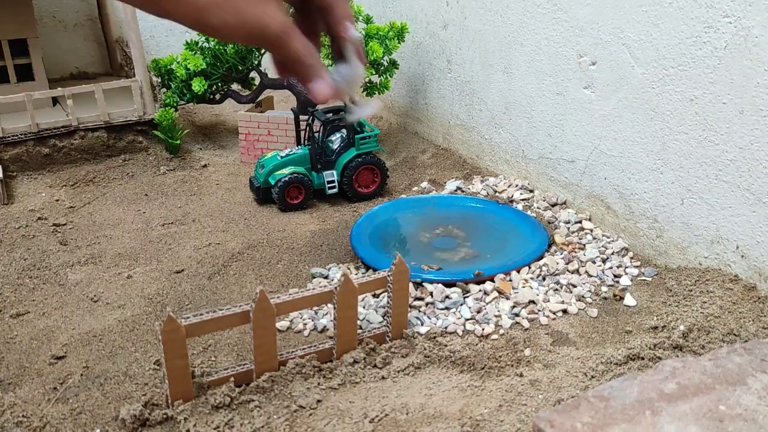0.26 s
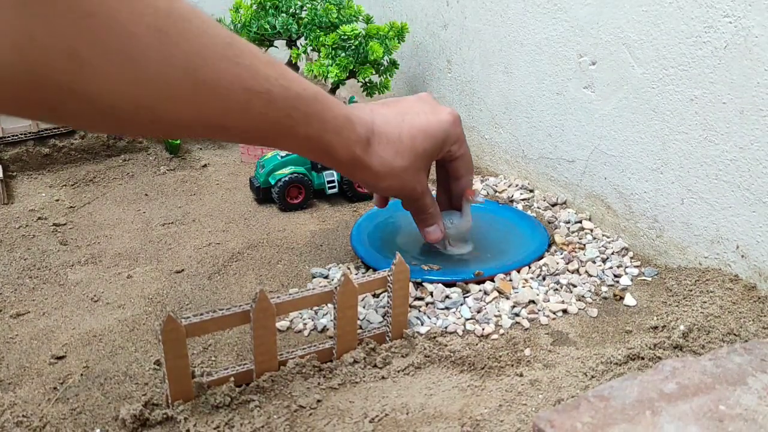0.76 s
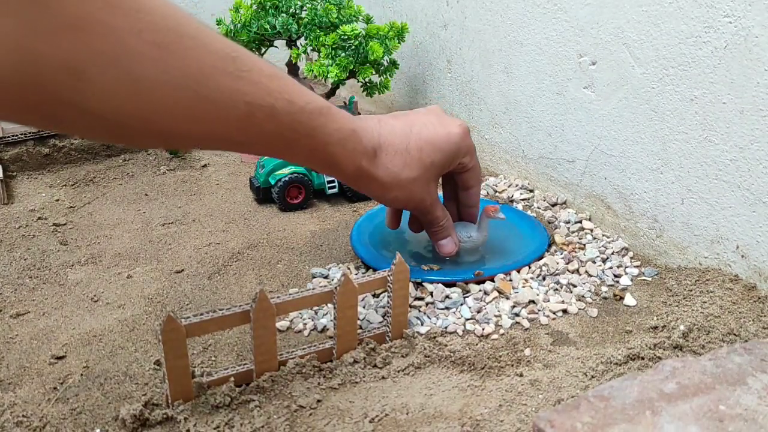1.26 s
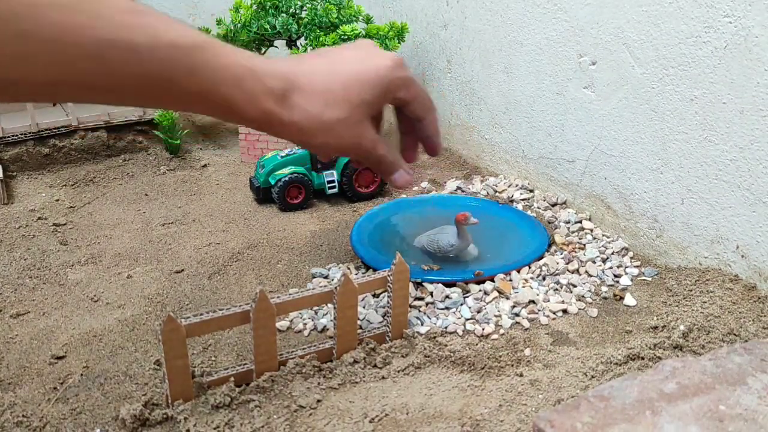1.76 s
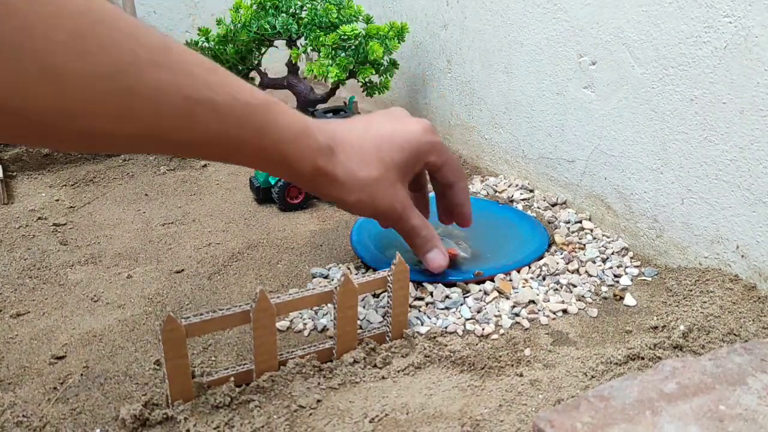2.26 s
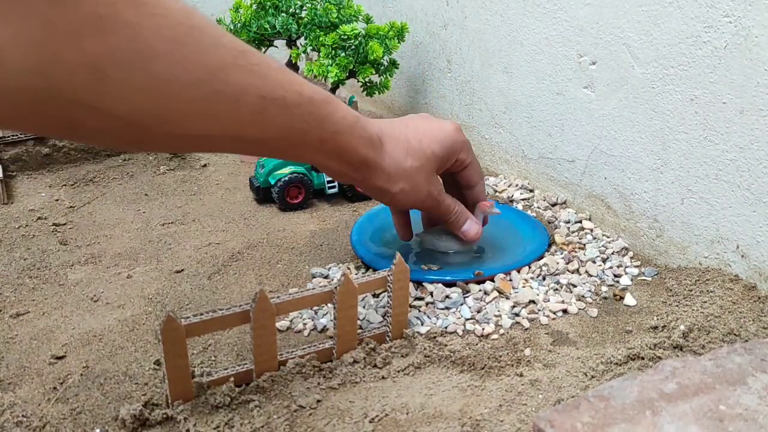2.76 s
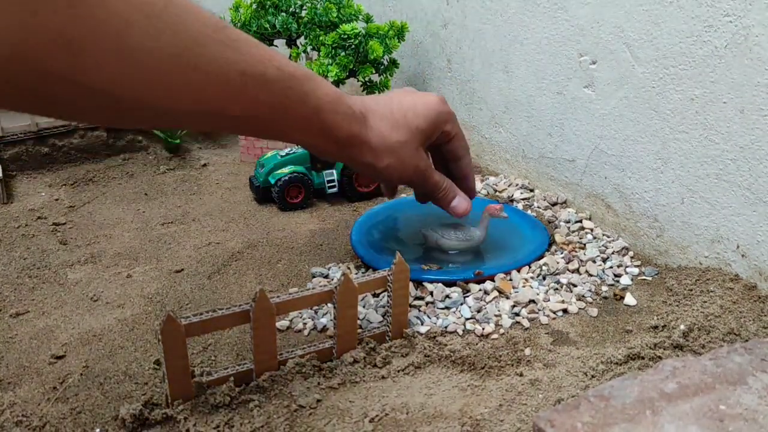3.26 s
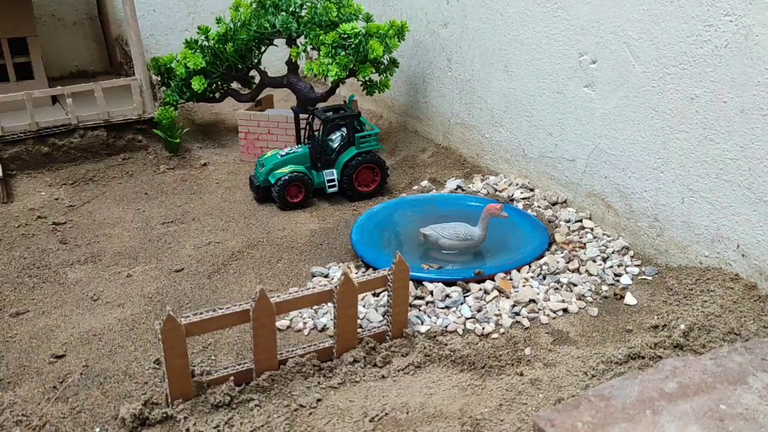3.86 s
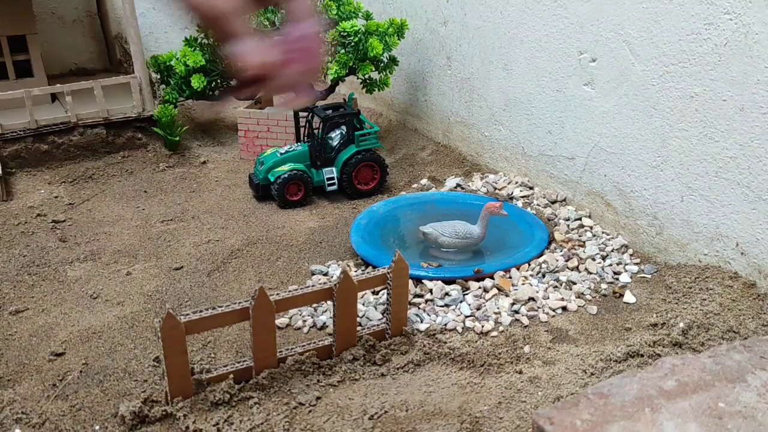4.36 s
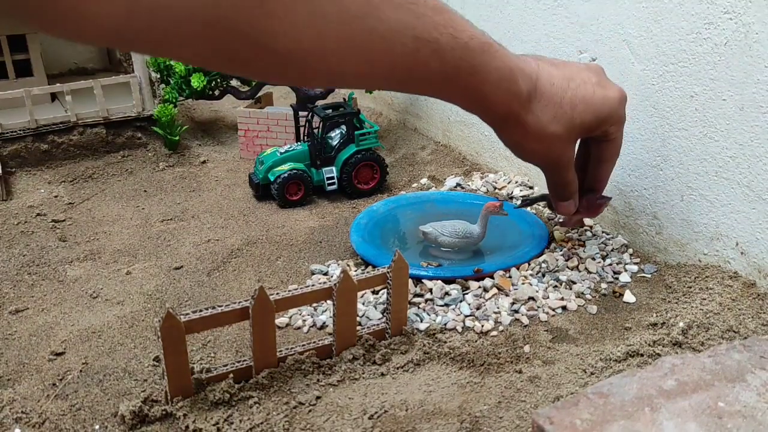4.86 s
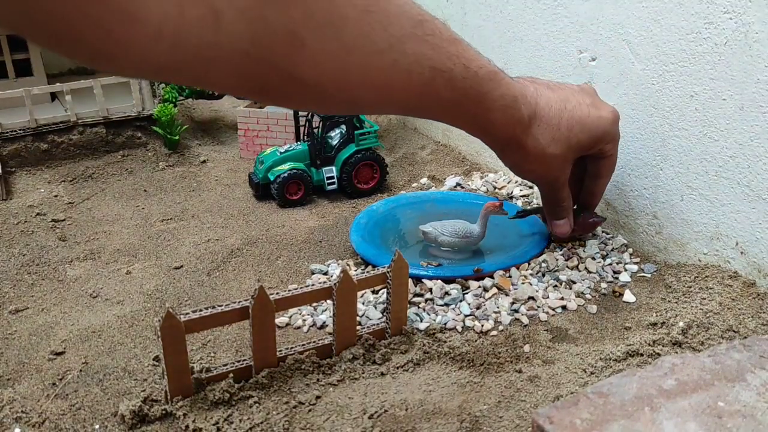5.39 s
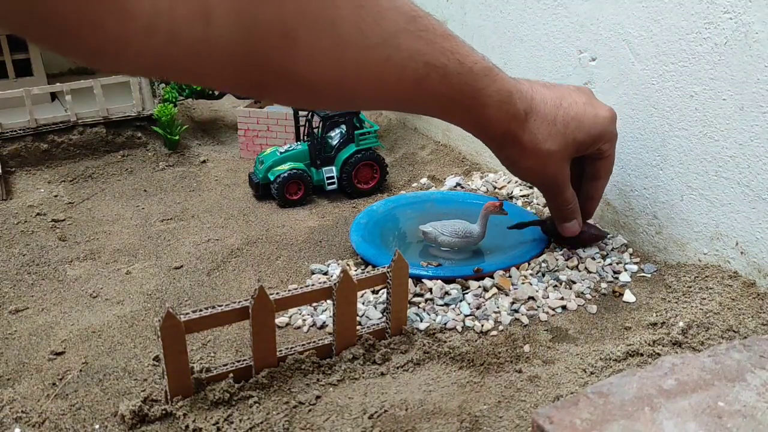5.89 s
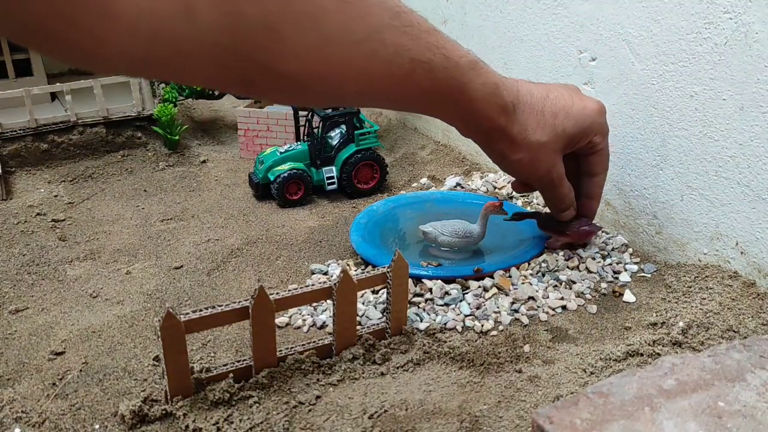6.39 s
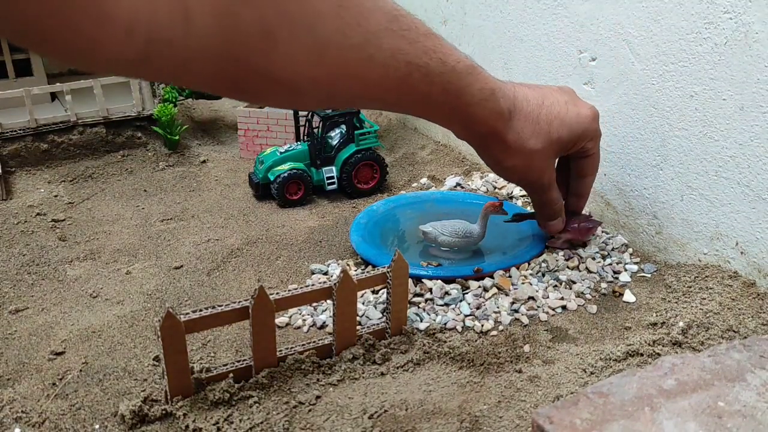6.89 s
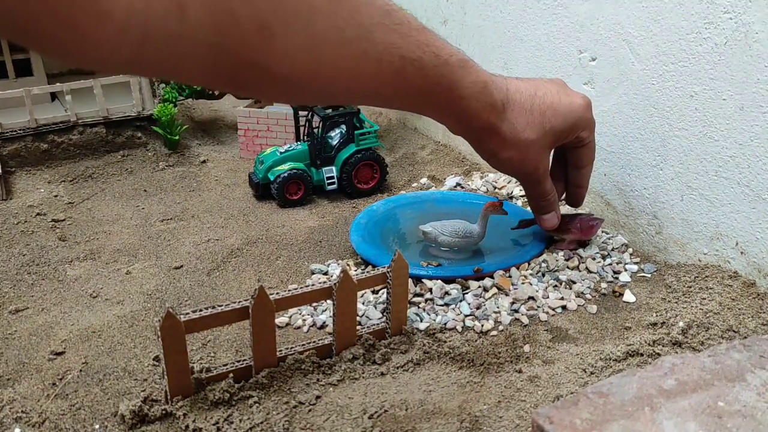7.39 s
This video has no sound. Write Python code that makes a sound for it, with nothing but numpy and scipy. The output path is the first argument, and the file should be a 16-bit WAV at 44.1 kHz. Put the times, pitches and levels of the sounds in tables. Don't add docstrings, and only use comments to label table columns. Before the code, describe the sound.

A stereo outdoor microphone catches lively bird chatter over faint far-traffic hiss. A clear rasping chirp opens, then twitters and tiny high squeaks; hoarse trills overlap around two seconds, a bright high call stands out past four, and busy mixed chirping closes the scene. Small wind thuds nudge the right side early, two dull knocks fall near start and end, and dry ticks click in the later part. Short wall reflections surround the birds.

```python
import sys
import numpy as np
from scipy import signal
from scipy.fft import rfft, irfft, next_fast_len
from scipy.io import wavfile
from scipy.ndimage import uniform_filter1d

SR = 44100
rng = np.random.default_rng(int(sys.argv[2]) if len(sys.argv) > 2 else 0)


def persist_wave(psi):
    counts = np.round(np.clip(psi, -1, 1) * 32767).astype(np.int16)
    wavfile.write(sys.argv[1], SR, np.atleast_2d(counts).T)


def volts_from_decibels(level):
    exponent = np.asarray(level, float) / 20
    return 10 ** exponent


N = 336924

# frequency in Hz, phase in rad.
PORT_PHASE = [(30, 0), (500, -.3), (5200, -.2), (7000, -.7), (8500, -1.3), (12000, -2.2), (15500, -2.8)]
# lift in Hz, swing on the beat in Hz, swing between
# beats in Hz, sharpness, swing at the start as a share, how far swing tops stay put as the call sinks
# (0-1), throat width in Hz.
LOW_PITCH_BEAT = (-90, 1300, 600, 3.8, 1, .9, 420)


def evened(x):
    return x / np.sqrt(np.mean(abs(x) ** 2) + 1e-20)


def read(points, hz):
    f, value = np.transpose(points)
    return np.interp(np.log(hz + 1), np.log(f + 1), value)


def add(mix, start_s, sound, pan_db):
    part = mix[:, round(start_s * SR):][:, :len(sound)]
    gains = volts_from_decibels(np.array([[pan_db / 2], [-pan_db / 2]]))
    part += gains * sound[:part.shape[1]]


def flutter(size, hz):
    z = rng.standard_normal((size, 2)) @ [1, 1j]
    r = np.exp(-2 * np.pi * hz / SR)
    return evened(signal.lfilter([1], [1, -2 * r, r * r], z))


def hiss():
    # frequency in Hz, level in dB.
    colour = [(22, -50.5), (40, -36.5), (60, -10.5), (100, -22.5), (160, -20.5), (300, -15), (900, 1),
              (1900, -6), (3000, -1), (4200, -4.5), (7400, -15), (10700, -17.5), (13000, -30),
              (16000, -21.5)]
    # frequency in Hz, correlation (-1 to 1).
    likeness = [(60, 0.4), (130, 0.74), (290, 0.863), (640, 0.706), (1410, 0.685), (3100, 0.216),
                (6820, -0.081), (15000, -0.069)]
    # frequency in Hz, level in dB.
    port_tilt = [(60, -12.5), (180, -2.5), (550, -3.5), (1650, -0.5), (4970, -0.5), (15000, 0)]
    frames, hz = N // 256 + 5, np.fft.rfftfreq(1024, 1 / SR)
    a, b, c, d, patches = rng.standard_normal((frames, 513, 5)).T
    patches = uniform_filter1d(patches, 14, 0)
    patches = evened(uniform_filter1d(patches, 16, 1))
    same = np.clip(read(likeness, hz), -1, 1)[:, None]
    right = a + 1j * b
    left = same * right * np.exp(1j * read(PORT_PHASE, hz))[:, None]
    left = left + np.sqrt(1 - same ** 2) * (c + 1j * d)
    z = np.array([left * volts_from_decibels(read(port_tilt, hz))[:, None], right])
    z *= volts_from_decibels(read(colour, hz)[:, None] + 1.193 * patches)
    noise = signal.istft(z, nperseg=1024, noverlap=768)[1][:, :N]
    return volts_from_decibels(-37.5) * evened(noise)


def hum():
    # frequency in Hz, width in Hz, level in dB.
    lines = [(59.15, 8.8, -72), (105.9, 6.7, -70), (233.1, 8.85, -69.5)]
    t = np.arange(N) / SR
    return sum(volts_from_decibels(db) * (flutter(N, width_hz) * np.exp(2j * np.pi * hz * t)).real
               for hz, width_hz, db in lines)


def wind_bumps():
    # start in seconds, peak in dB, left over right in dB.
    puffs = [
        (0.019, -62.5, -12),
        (0.32, -46.5, -15),
        (0.459, -51.5, -14.5),
        (0.549, -55, -19.5),
        (0.699, -68.5, -12),
        (1.979, -57.5, -12.5),
        (2.298, -66, -12.5),
        (2.749, -55, -9),
    ]
    out, t = np.zeros((2, N)), np.arange(6000) / SR
    for start_s, db, pan_db in puffs:
        thud = np.sin(2 * np.pi * 45 * t + flutter(len(t), 9.5).real)
        push = 9.8 * np.sin(np.pi * t / t[-1]) ** 2 * np.exp(-t / 0.0192)
        add(out, start_s, volts_from_decibels(db) * thud * push, pan_db)
    return out


def foliage(x, spread_s, count=7):
    whole = signal.hilbert(x, next_fast_len(len(x)))[:len(x)]
    late = (rng.random(count) * spread_s * SR).astype(int)
    copies = ((flutter(len(x), 18) * np.pad(whole, (n, 0))[:len(x)]).real for n in late)
    return sum(copies) / np.sqrt(count)


def whistle(s, hz, db, blur=0.056):
    t = np.arange(0, s[-1], 1 / SR)
    turn = np.exp(2j * np.pi * np.cumsum(np.interp(t, s, hz)) / SR)
    tone = turn * (1 - blur / 2 + blur / 2 * flutter(len(t), 250))
    return volts_from_decibels(np.interp(t, s, db)) * tone.real * signal.windows.tukey(len(t), .15)


def twitters():
    # start in seconds, level in dB, pitch factor, opening in dB, blur (0-1).
    twitter_rows = [
        (.083, -37, 1, -3, .3),
        (.868, -38.5, .98, 1, .45),
        (3.951, -37, .96, -12, .15),
        (6.509, -39, 1.01, 8, .5),
        (7.347, -35.5, 1, 2, .4),
    ]
    # time in seconds, pitch in Hz, level in dB.
    spike = [(0, 4200, -14), (.008, 5000, -7), (.018, 5700, -9), (.024, 4600, -5), (.032, 4150, -4),
             (.046, 3930, -7), (.054, 3800, -22)]
    # time in seconds, pitch in Hz, level in dB.
    hop = [(.07, 3700, -16), (.08, 4000, -4), (.089, 4500, 0.1), (.096, 3800, -4), (.104, 3550, -5),
           (.11, 3600, -14)]
    out = np.zeros((2, N))
    tune_s, tune_hz, tune_db = np.transpose(spike + hop)
    for start_s, db, factor, open_db, blur in twitter_rows:
        opening_db = open_db * (np.arange(len(tune_s)) < 3)
        tone = whistle(tune_s, factor * tune_hz, db + 11 + tune_db + opening_db, blur)
        tone = np.pad(tone, (0, 3000))
        add(out, start_s, np.sqrt(1 - blur) * tone + np.sqrt(blur) * foliage(tone, .04), -1.1)
    return out


def curved_whistle(length_s, start_hz, middle_hz, end_hz, db):
    u = np.linspace(0, 1, 12)
    curve = np.polyfit([0, .5, 1], [start_hz, middle_hz, end_hz], 2)
    return whistle(u * length_s, np.polyval(curve, u), db + 3 + 9 * (np.sin(np.pi * u) - 1))


def squeaks():
    # start in seconds, length in seconds, start pitch in Hz, level in dB.
    squeak_rows = [
        (.136, .01, 14200, -50),
        (.658, .009, 13000, -52),
        (.701, .006, 14200, -52),
        (.716, .013, 14000, -50),
        (.802, .005, 15000, -55),
        (.821, .006, 14000, -50),
        (.836, .012, 14200, -49),
        (.938, .007, 14200, -50),
        (.953, .012, 14000, -50),
    ]
    out = np.zeros((2, N))
    for start_s, length_s, hz, db in squeak_rows:
        fall_hz = 185000 * length_s
        middle_hz = hz - .58 * fall_hz
        add(out, start_s, curved_whistle(length_s, hz, middle_hz, hz - fall_hz, db), 3)
    return out


def phrase(call, voice, effort, arch):
    start_s, length_s, peak_db, top_hz, end_hz = call
    loudest, first_db, top_db = voice
    attack_s, release_s, swell_db_per_s, fade_db_per_s = effort
    crest, scoop_hz, bend = arch
    t = np.arange(0, length_s, 1 / SR)
    late = t - loudest * length_s
    drop_db = np.where(late < 0, -swell_db_per_s * late, fade_db_per_s * late)
    attack = np.clip(1 - t / attack_s, 0, 1)
    release = np.clip(1 - (length_s - t) / release_s, 0, 1)
    drop_db += 5.5 * (attack + release)
    sag = (t / length_s - crest) / (1 - crest)
    hz = top_hz - scoop_hz * np.clip(1 - t / length_s / crest, 0, 1) ** 2
    hz -= (top_hz - end_hz) * np.clip(sag, 0, 1) ** bend
    first_db = first_db + 0.91 * drop_db + 1.5 * sag
    return start_s + t, peak_db - drop_db, hz, first_db, top_db + 0.072 * drop_db


def buzz(course, beat_s, per_s, hoarse, beat):
    # noisy share (0-1), noise width in Hz.
    rasps = [(.2, 400), (.08, 330), (.4, 600), (.45, 700), (.7, 900), (.8, 1100)]
    # frequency in Hz, gain in dB.
    beak_gain = [(1750, -36), (2050, -22), (2300, -7), (2750, -7), (3200, 3), (4100, 0), (4800, -1),
                 (5500, -2), (6600, -7), (7300, -22), (9000, -25), (12000, -22), (14000, -38)]
    t, level_db, hz, first_db, top_db = course
    lift_hz, on_hz, off_hz, sharp, early, stay, throat_hz = beat
    sunk_hz = stay * (2000 - hz / 2)
    grow = np.linspace(early, 2 - early, len(t))
    swing = np.cos(2 * np.pi * per_s * (t - beat_s) + .8 * hoarse * flutter(len(t), 20).real)
    pitch = hz / 2 + lift_hz + (grow * on_hz + sunk_hz) * np.exp(sharp * (swing - 1))
    pitch += (grow * off_hz + sunk_hz) * np.exp(-sharp * (swing + 1))
    pitch += 130 * hoarse * flutter(len(t), 150).real
    turn = np.exp(2j * np.pi * np.cumsum(pitch) / SR)
    partials = []
    for k, (rasp, rasp_hz) in enumerate(rasps, 1):
        rasp = min(rasp + .45 * hoarse, 1)
        unsteady = np.sqrt(1 - rasp) + np.sqrt(rasp) * flutter(len(t), rasp_hz)
        partials.append(volts_from_decibels(read(beak_gain, k * pitch)) * (unsteady * turn ** k).real)
    partials[1] *= .25 + 1 / (1 + ((2 * pitch - hz) / throat_hz) ** 2)
    groups = (partials[0],
              partials[1] + volts_from_decibels(-41) * partials[2],
              volts_from_decibels(-10) * partials[2] + sum(partials[3:]))
    levelled = []
    for group in groups:
        group = np.sqrt(1 - hoarse) * group + np.sqrt(hoarse) * foliage(group, .025)
        levelled.append(group / np.sqrt(uniform_filter1d(group ** 2, 1810) + 1e-12))
    first, second, top = levelled
    voice = second + volts_from_decibels(first_db) * first + volts_from_decibels(top_db) * top
    fade = np.clip(np.minimum(t - t[0], t[-1] - t) / .02, 0, 1)
    return volts_from_decibels(level_db - 0.1469) * voice * np.sqrt(fade)


def trilled_calls(calls, voices, trills, hoarse, effort, arch, beat):
    out = np.zeros((2, N))
    for call, voice, (beat_s, per_s, pan_db), hoarseness in zip(calls, voices, trills, hoarse):
        course = phrase(call, voice, effort, arch)
        add(out, call[0], buzz(course, beat_s, per_s, hoarseness, beat), pan_db)
    return out


def low_calls():
    # start in seconds, length in seconds, peak of the second partial in dB, its top
    # in Hz, its end in Hz.
    calls = [
        (.215, .315, -24.5, 4139, 3624),
        (1.93, 0.4256, -29, 4191, 3646),
        (2.3, .33, -29.5, 3961, 3859),
        (3.19, 0.2576, -26, 4177, 3740),
        (3.66, .27, -28.5, 4263, 3712),
        (5.145, 0.292, -25.5, 4269, 3713),
    ]
    # loudest moment as a share of the length, first partial over the second
    # in dB, top partials over it in dB.
    voices = [(0.52, -8.5, -12.5), (0.7, -12, -11.5), (0.15, -6.5, -9), (0.69, -10, -14.5), (0.03, -8, -10),
              (0.59, -9, -12)]
    # time of one beat in seconds, beats per second, left over right in dB.
    trills = [(0.3921, 59.2, -1.7), (2.129, 52.9, -1.57), (2.4527, 43.8, -1.96), (3.329, 48.8, -1.05),
              (3.8364, 43.84, -1.43), (5.3026, 49.5, -1)]
    hoarse = [.25, .7, .95, .22, .8, .14]
    # attack in seconds, release in seconds, swell in dB per second, fade in dB per second.
    effort = (0.111, 0.0387, 13.5, 52)
    # top as a share of the length, scoop up to it in Hz, bend of the sag.
    arch = (0.2699, 306.7, 1.2)
    return trilled_calls(calls, voices, trills, hoarse, effort, arch, LOW_PITCH_BEAT)


def far_calls():
    calls = [(.93, 0.1266, -40, 3860, 3740), (1.3, 0.534, -44.5, 4020, 3436),
             (4.2, 0.193, -35.5, 4595, 4450), (4.59, 0.2875, -29, 4183, 3224),
             (4.925, .24, -36, 3402, 2905), (6.13, 0.32, -43, 3589, 3033), (6.535, .35, -27, 4254, 2890),
             (6.9, 0.221, -40.5, 3201, 3267), (7.43, 0.277, -29.5, 3720, 3250),
             (.5, 0.332, -37.5, 5026, 4902), (2.1, 0.469, -37.5, 5133, 4945), (2.6, .27, -36, 3030, 2782),
             (4.34, 0.345, -35.5, 3306, 2805), (7.15, 0.2523, -36.5, 3137, 3001),
             (2.18, 0.1984, -29.5, 3462, 3184), (6.57, .3, -34, 3195, 2685), (4.66, .24, -33.5, 3523, 3017)]
    voices = [(0.45, -8, -6), (0.402, -7, -3.5), (0.46, -15, -23.5), (0.46, -23.5, -11.5),
              (0.497, -6.5, -27.5), (0.46, -6.5, -30.5), (0.305, -12, -13.5), (0.44, 0, -26),
              (0.525, -20.5, -15), (0.44, -0.5, -16.5), (0.595, -5, -17), (0.373, -8, -7),
              (0.237, -9.5, -19.5), (0.38, -12.5, -24.5), (0.625, -15.5, -28), (0.44, -13.5, -27),
              (0.51, -23, -26)]
    trills = [(1.0336, 41.82, -1.5), (1.5823, 50.37, 1), (4.2374, 41.26, -1.3), (4.7371, 47.7, -1.5),
              (5.036, 48.58, -3), (6.2937, 40.0, -1), (6.7193, 46.56, -0.8), (6.987, 47.45, -2.5),
              (7.5379, 48.44, -3.5), (.62, 46.18, -1.5), (2.35, 45, -1), (2.7, 46.86, -3), (4.45, 45.6, -3),
              (7.25, 48, -4), (2.25, 48, -4), (6.7, 46.9, -4.5), (4.75, 47.22, -5)]
    hoarse = [.9, .9, .8, .6, .75, .9, .6, .7, .75, .9, .9, .9, .9, .8, .8, .85, .85]
    effort = (.04, .05, 40, 50)
    arch = (.2, 98.1, 1.2)
    beat = (-170, 1000, 560, 3, .9, .5, 700)
    return trilled_calls(calls, voices, trills, hoarse, effort, arch, beat)


def rattle_calls():
    calls = [
        (.62, .21, -36.5, 3883, 3639),
        (3.51, 0.183, -33, 3702, 3696),
        (5.485, 0.1765, -34.5, 3710, 3529),
    ]
    voices = [(0.163, 3.22, -6.5), (0.883, 1.24, -12), (0.43, 1, -17.5)]
    trills = [(0.715, 49.31, -1.3), (3.596, 49.72, -1.6), (5.6168, 47.66, -1.9)]
    hoarse = [.17, .22, .14]
    effort = (0.042, 0.0465, 44, 82)
    arch = (.3, 49, 1.059)
    return trilled_calls(calls, voices, trills, hoarse, effort, arch, LOW_PITCH_BEAT)


def knocks():
    # start in seconds, level in dB.
    knock_rows = [
        (.318, -39.5),
        (6.73, -42.5),
    ]
    # frequency in Hz, level in dB, t60 in seconds.
    modes = [(578.7, 0.1, 0.155), (908, 2.7, 0.13)]
    out, t = np.zeros((2, N)), np.arange(6000) / SR
    for start_s, knock_db in knock_rows:
        body = sum(volts_from_decibels(knock_db + db - 60 * t / t60_s) * np.sin(2 * np.pi * hz * t)
                   for hz, db, t60_s in modes)
        add(out, start_s, body, 3)
    return out


def arched_squeaks():
    # start in seconds, length in seconds, end pitch in Hz, lift of the middle in Hz,
    # level in dB.
    arches = [
        (.805, .015, 8100, 2700, -47),
        (.922, .015, 8100, 2700, -47),
    ]
    # start in seconds, length in seconds, start, middle and end pitch in Hz, level in dB.
    slide = (.945, .012, 9800, 9000, 6800, -53)
    side = np.zeros((2, N))
    for start_s, length_s, hz, lift_hz, db in arches:
        add(side, start_s, curved_whistle(length_s, hz, hz + lift_hz, hz, db), -3)
    add(side, slide[0], curved_whistle(*slide[1:]), -3)
    return side * [[-1], [1]]


def peeps():
    # start in seconds, length in seconds, middle in Hz, glide in Hz, level in dB.
    peep_rows = [
        (1.201, 0.0216, 7950, -160, -48.5),
        (1.44, 0.0296, 4240, -140, -37.5),
        (1.914, 0.0356, 3770, 120, -40),
        (3.08, 0.155, 4700, -100, -49.5),
        (4.1, 0.032, 3420, 10, -35.5),
        (4.227, 0.04, 3380, 29.5, -43.5),
        (5.781, 0.0248, 4230, -20, -39.5),
    ]
    out, bow_hz = np.zeros((2, N)), 40
    for start_s, length_s, hz, glide_hz, db in peep_rows:
        begin_hz = hz - glide_hz / 2 - bow_hz
        end_hz = hz + glide_hz / 2 - bow_hz
        add(out, start_s, curved_whistle(length_s, begin_hz, hz, end_hz, db), -1.1)
    return out


def high_calls():
    calls = [
        (2.6, .17, -27.5, 4909, 4308),
        (4.345, 0.1615, -21, 5240, 4640),
        (7.09, .26, -26.5, 5011, 3621),
    ]
    voices = [(0.277, -12.5, -11.5), (0.342, -18, -10.5), (.35, -20, -9.5)]
    trills = [(2.716, 49.55, -0.47), (4.4546, 49.61, 1.0), (7.2107, 50.24, -0.026)]
    hoarse = [.4, .08, .22]
    effort = (0.0663, 0.0394, 95, 64)
    arch = (.3, 103.5, .9)
    beat = (400, -780, -400, 2.3, .7, 0, 800)
    return trilled_calls(calls, voices, trills, hoarse, effort, arch, beat)


def grit_ticks():
    # start in seconds, peak in dB.
    tick_rows = [
        (5.0589, -34),
        (5.2046, -23.5),
        (5.8187, -32.5),
        (6.976, -28),
    ]
    out, t = np.zeros((2, N)), np.arange(6000) / SR
    for start_s, db in tick_rows:
        grit = (flutter(len(t), 1800) * np.exp(2j * np.pi * 11000 * t)).real
        add(out, start_s, volts_from_decibels(db - 7 - 60 * t / .015) * grit, 0)
    return out


def birds():
    out = twitters() + low_calls() + far_calls() + rattle_calls() + peeps() + high_calls()
    hz = np.fft.rfftfreq(N, 1 / SR)
    out[0] = irfft(rfft(out[0]) * np.exp(1j * read(PORT_PHASE, hz)), N)
    return out


def yard(x, t60_s):
    taps = np.zeros((2, SR // 2))
    at = np.arange(200, SR // 2 - 20, 20)
    at = at + rng.integers(0, 20, (2, len(at)))
    np.put_along_axis(taps, at, rng.choice([-1., 1.], at.shape), 1)
    taps *= volts_from_decibels(-60 * np.arange(SR // 2) / SR / t60_s)
    return signal.fftconvolve(x, taps / np.linalg.norm(taps[0]), axes=1)[:, :N]


def scene():
    flock = birds()
    echoes = volts_from_decibels(-6) * yard(flock, .3)
    small_noises = wind_bumps() + squeaks() + knocks() + arched_squeaks() + grit_ticks()
    return flock + echoes + hiss() + hum() + small_noises


def top_cut(x):
    return signal.sosfilt(signal.butter(12, 15710, fs=SR, output="sos"), x)


def record(dry):
    return top_cut(dry)


dry = scene()
out = record(dry)
persist_wave(out)
```